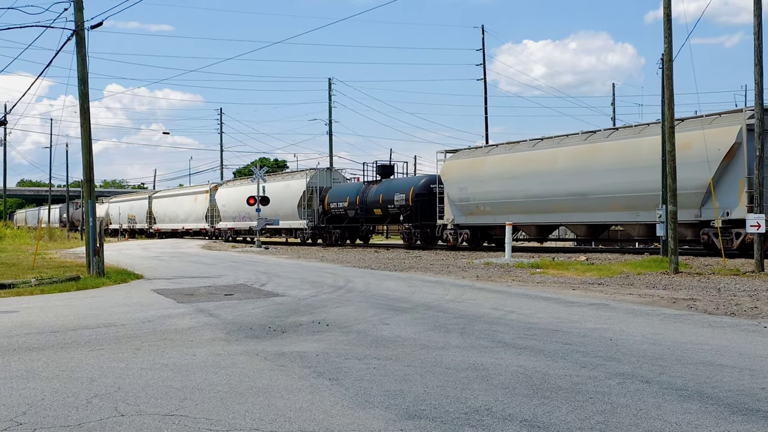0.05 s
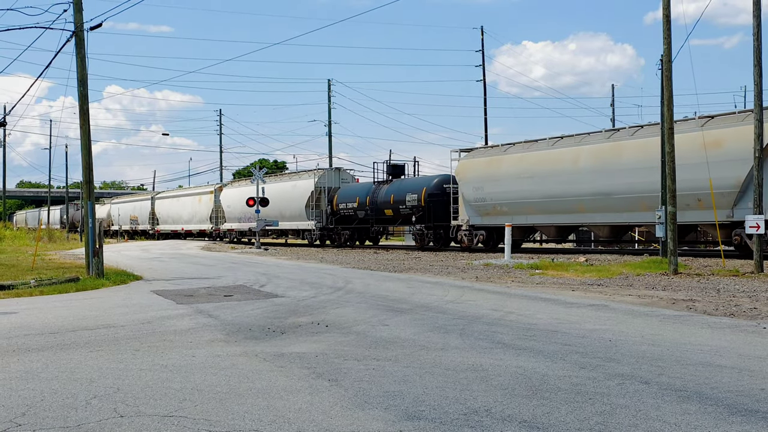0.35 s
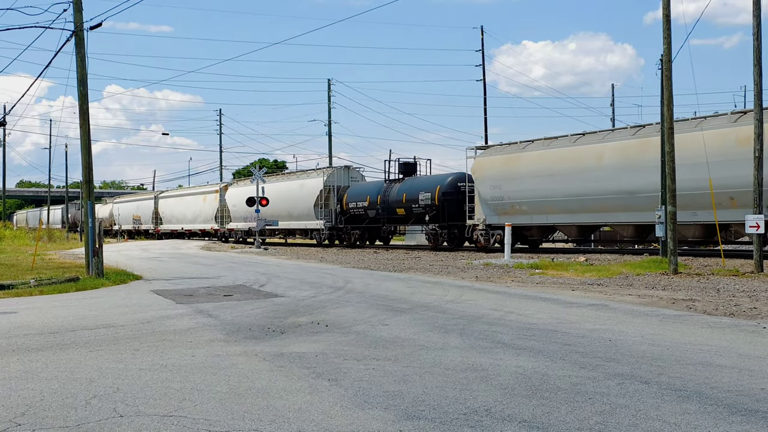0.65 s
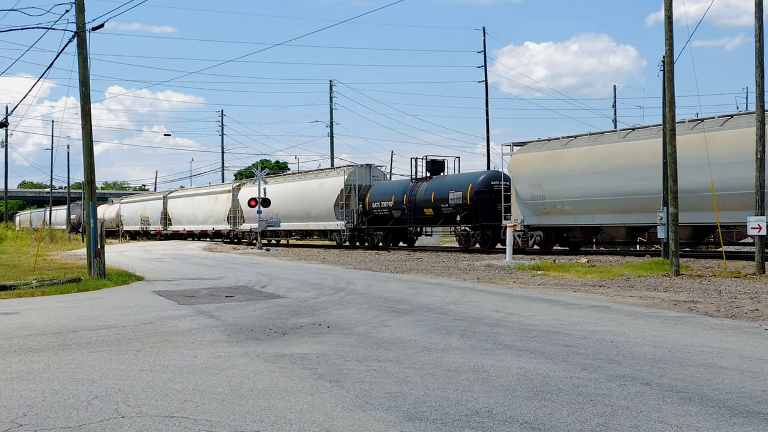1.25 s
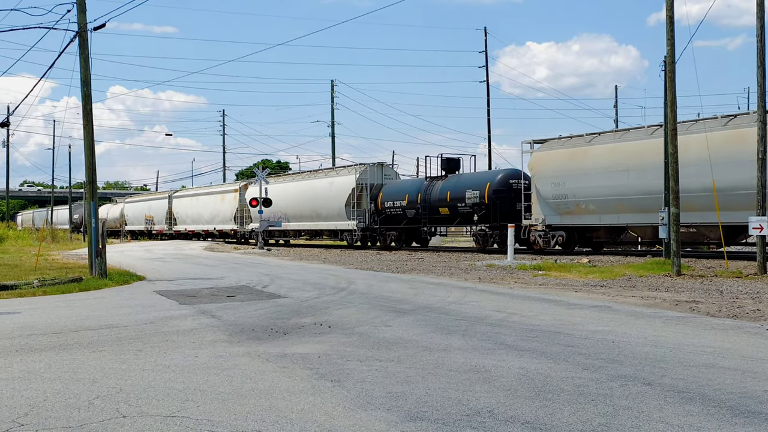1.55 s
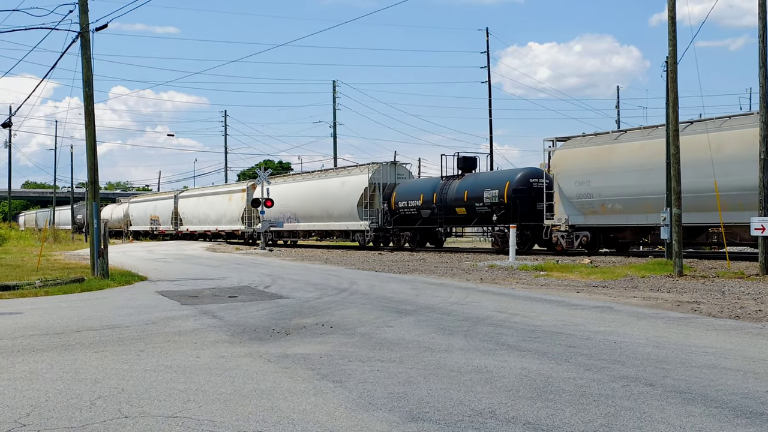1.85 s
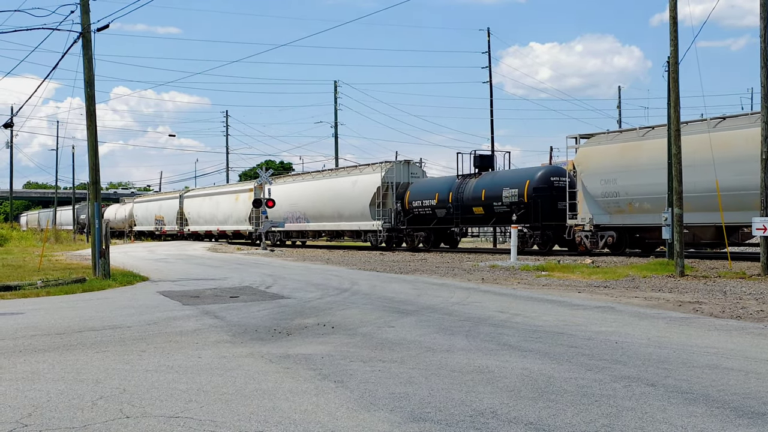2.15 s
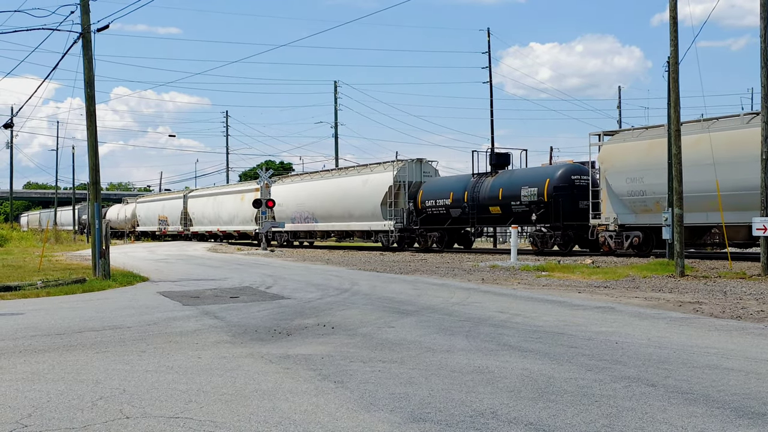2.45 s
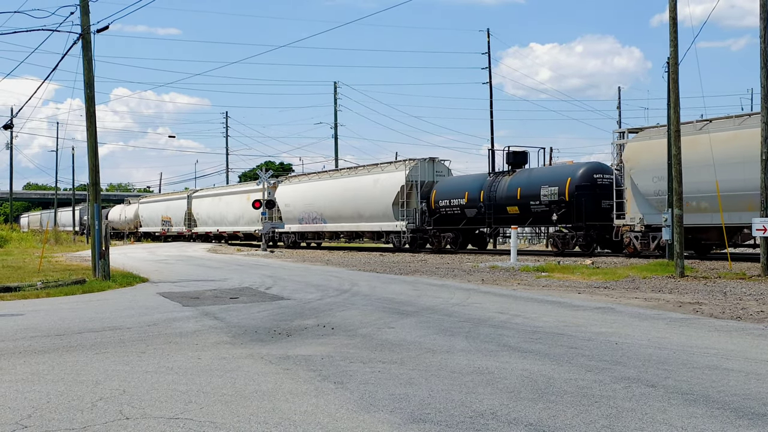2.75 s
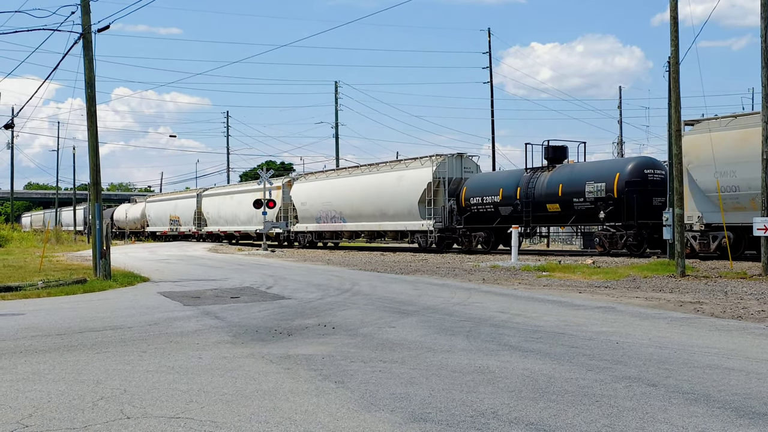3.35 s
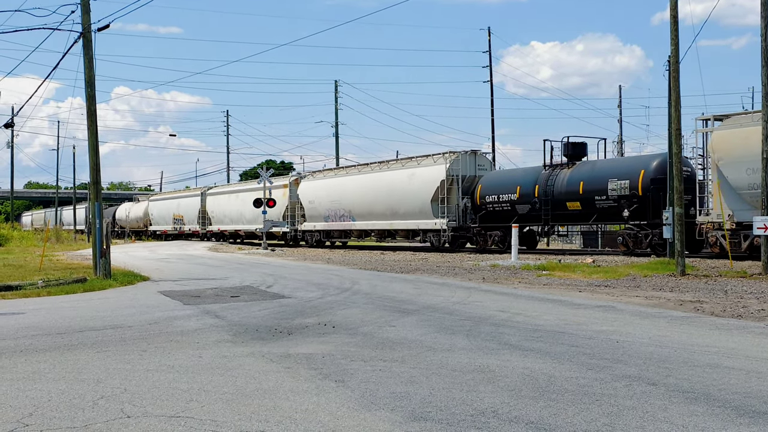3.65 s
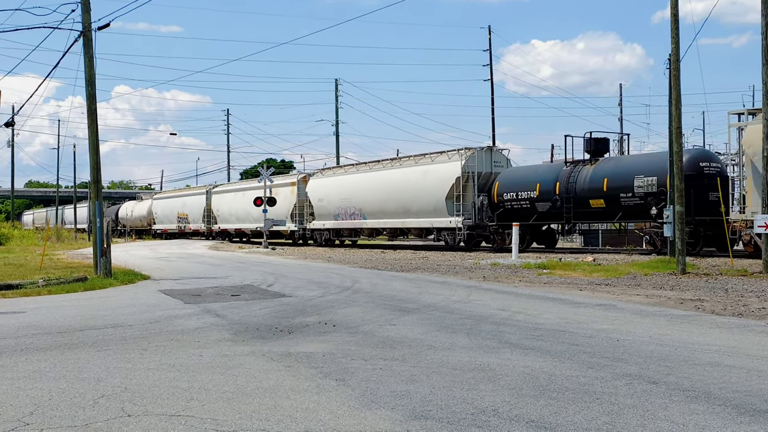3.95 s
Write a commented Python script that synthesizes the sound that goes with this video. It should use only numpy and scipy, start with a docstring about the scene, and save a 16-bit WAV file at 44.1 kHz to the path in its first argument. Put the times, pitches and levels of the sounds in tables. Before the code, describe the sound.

A freight train rolls past with rumbling cars, metallic clanks and high-pitched wheel squeal.

```python
"""At a road crossing, a long freight train rolls through a curve a few car lengths away.
The cars rumble, steel roars on steel, and bogies clank and rattle as wheels strike the rail joints.
Flanges grind on the rail, and stick-slip friction drives the ring modes of the wheels: one long
squeal hops between two groups of modes; later other wheels give a few lower, shorter squeals."""
import sys
import numpy as np
from scipy import signal
from scipy.fft import rfft, irfft
from scipy.io import wavfile

SR = 44100
rng = np.random.default_rng(int(sys.argv[2]) if len(sys.argv) > 2 else 0)


def wav_record(signal):
    """Record a signal, one row per channel, as 16-bit PCM in the file named by sys.argv[1]."""
    frames = np.transpose(np.atleast_2d(signal))
    bounded = np.clip(frames, -1, 1)
    # unit amplitude maps onto the largest positive 16-bit level
    quanta = np.round(bounded * 32767).astype(np.int16)
    wavfile.write(sys.argv[1], SR, quanta)


N = 176400
TIME = np.arange(N) / SR
FREQS = np.maximum(np.arange(N // 2 + 1) * SR / N, 1)
CUTOFF_HZ = 15800
NEAR_LAG_S = .00047   # sound from the near wheels reaches the left port this much later


def from_db(db):
    """Amplitude ratio: a factor of ten per 20 dB."""
    return 10 ** (np.asarray(db) / 20)


def unit_rms(x):
    """Normalisation to unit mean power."""
    return x / np.sqrt(np.mean(np.abs(x) ** 2) + 1e-20)


def in_time(rows):
    """Linear interpolation of each column at every sample."""
    times, *columns = np.transpose(rows)
    return [np.interp(TIME, times, column) for column in columns]


def at_hz(points):
    """Interpolation over log frequency at every bin."""
    hz, value = np.transpose(points)
    return np.interp(np.log(FREQS), np.log(hz), value)


def bandpass(points):
    """Band-pass response: follows a spectrum and falls steeply beyond its ends."""
    below, above = .85 * points[0][0] / FREQS, .85 * FREQS / points[-1][0]
    return from_db(at_hz(points)) / np.sqrt(1 + below ** 12 + above ** 12)


def pan(db):
    """Constant-power panning; db is the level of left over right."""
    ratio = np.atleast_1d(from_db(db))
    return np.array([ratio, np.ones_like(ratio)]) * np.sqrt(2 / (1 + ratio ** 2))


def from_right(x, lag_s):
    """Path difference: a source on the right reaches the left microphone port late."""
    return np.array([np.pad(x[0], (round(lag_s * SR), 0))[:N], x[1]])


def drift(corner_hz):
    """Random modulation: low-passed Gaussian noise of unit RMS."""
    step, settle = 20, 4000
    pole = np.exp(-2 * np.pi * corner_hz * step / SR)
    white = rng.standard_normal(N // step + settle + 2)
    slow = signal.lfilter([1], [1, -2 * pole, pole * pole], white)[settle:]
    return np.interp(np.arange(N) / step, np.arange(len(slow)), unit_rms(slow))


def envelope(start, attack, hold, decay):
    """Linear rise, then exponential damping from `hold` seconds after the start."""
    age = TIME - start
    return np.clip(age / attack, 0, 1) * np.exp(-np.maximum(age - hold, 0) / decay)


def mid_side(mid, side, correlation):
    """Partial coherence: a common part plus a part of opposite sign in the two channels."""
    return np.sqrt(1 + correlation) * mid + np.sqrt(1 - correlation) * side * [[1], [-1]]


# Likeness of the sound field at the two ports: f/Hz, correlation (0-1)
CORRELATION = [(30, .55), (60, 0.79), (130, 0.85), (250, 0.85), (500, 0.86), (1000, 0.91), (2000, .66),
               (4000, 0.42), (8000, 0.07), (15000, 0)]


def noise(gain):
    """Spatial coherence: coloured stereo noise, alike in the bass and diffuse in the treble."""
    mid, side = rfft(rng.standard_normal((2, N)))
    return unit_rms(irfft(gain * mid_side(mid, side, at_hz(CORRELATION)), N))


def rough_noise(gain, depth_db, rate_hz):
    """Amplitude modulation: the octave bands of a noise flicker, partly together."""
    together = drift(rate_hz)
    out = 0
    for octave in range(4, 15):
        band = gain * np.sqrt(np.maximum(1 - np.abs(np.log2(FREQS) - octave), 0))
        if band.max() > gain.max() / 100:
            carrier = np.linalg.norm(band) * noise(band)
            out = out + carrier * from_db(depth_db * (together + drift(rate_hz)) / np.sqrt(2))
    return unit_rms(out)


def dense_modes(depth_db):
    """High modal density: the many narrow resonances of large steel parts, as a gain per bin."""
    return from_db(depth_db * drift(74)[:len(FREQS)])


# Rumble spectrum: f/Hz, level/dB. Its course: t/s, level/dB. All tabulated levels are relative.
RUMBLE_SPECTRUM = [(12, -42), (20, -6.5), (54, 2), (77, 0), (119, -6.5), (192, -4.5), (268, -9), (352, -15),
                   (676, -21), (818, -39), (900, -31.5), (1170, -62), (1980, -120)]
RUMBLE_LEVEL = [(0.0, -12.5), (0.47, -10), (0.57, -16.5), (0.66, -12.5), (2.84, -12.5), (4.0, -11.5)]


def car_rumble():
    """Low-frequency radiation: the moving cars give a lumpy rumble."""
    gain = from_db(in_time(RUMBLE_LEVEL)[0] + 1) * pan(.14)
    rumble = rough_noise(bandpass(RUMBLE_SPECTRUM), depth_db=1.25, rate_hz=33)
    return from_right(gain * rumble, lag_s=.00026)


# Spectrum of steel rolling on steel: f/Hz, level/dB. Its course: t/s, level/dB
ROLLING_SPECTRUM = [(410, -30), (700, -0.5), (874, -19.5), (1180, -8.5), (1720, -11), (1910, -10.5),
                    (2200, -12), (3130, -14.5), (5140, -19), (6090, -17), (15800, -51)]
ROLLING_LEVEL = [(0, -27), (.5, -26.5), (.75, -32.5), (1.8, -31), (2.05, -25), (2.3, -28), (2.42, -25.5),
                 (2.75, -28.5), (3.2, -28.5), (3.36, -25), (4, -26.5)]


def rolling_roar():
    """Rolling noise: wheel-rail contact excites the resonances of the steel, straight ahead."""
    roar = rough_noise(bandpass(ROLLING_SPECTRUM) * dense_modes(3), depth_db=1.56, rate_hz=19)
    return from_db(in_time(ROLLING_LEVEL)[0] + 1.5) * pan(2) * roar


# Spectra of the car's thud, the steel's clang and the bright splash: f/Hz, level/dB
THUD_SPECTRUM = [(70, -25), (150, -4.5), (250, 0), (450, -5), (700, -8.5), (900, -21.5), (1500, -23.5)]
CLANG_SPECTRUM = [(470, -43), (800, -16), (1180, -10.5), (2300, -0.5), (3230, -9.5), (4340, -1.5),
                  (5770, -16.5), (6220, -9.5), (7280, -4.5), (8810, -14.5), (10000, -21), (13000, -51),
                  (22000, -120)]
SPLASH_SPECTRUM = [(6000, -11), (8000, -13), (10000, -1.5), (12000, 2.5), (16000, -0.5)]
# Resonances of a bogie: f/Hz, bandwidth/Hz, level/dB
BOGIE_MODES = [(1995, 5.7, -21), (2257, 48, 0), (3060, 23, 8), (3530, 48, -8.5), (4040, 18, -24),
               (4510, 140, -9.5), (5463, 300, 1), (6280, 190, -7)]
# Impacts at joints: t/s, peak/dB (not played), thud/dB, clang/dB, splash/dB, rattle length/s
IMPACTS = [(0.078, -17, -13, -40, -19, 0.022), (0.1735, -6, -11, -14.5, -35, 0.018),
           (0.2437, -3, -9.5, -10.5, -21.5, 0.039), (0.4946, -5, -12.5, -13.5, -16, 0.029),
           (0.6428, 2, -11, -16, -21, 0.042), (0.899, -10, -20, -20, -45, 0.036),
           (1.026, -14, -31, -25, -39, 0.03), (1.21, -2.5, -13.5, -13.5, -20.5, 0.011),
           (1.445, -12, -14.5, -21.5, -33, 0.037), (1.6055, -9, -11.5, -17, -30, 0.038),
           (1.8545, -9, -23, -18.5, -33, 0.014), (1.965, -13, -10, -26, -40, 0.034),
           (2.364, -16, -10.5, -27.5, -43, 0.042), (2.93, -19, -12, -31.5, -45, 0.03),
           (3.3064, -15, -12, -32, -45, 0.041), (3.885, -16, -16, -29, -47, 0.038)]


def joint_clanks():
    """Impact excitation: a wheel drops at a joint, the car thuds, loose steel rattles and rings."""
    attack_s = .002
    thud = clang = splash = 0
    for start, _, thud_db, clang_db, splash_db, rattle_s in IMPACTS:
        knock = from_db(2) * envelope(start, attack_s, attack_s, decay=.011)
        crack = from_db(-3) * envelope(start, attack_s, attack_s, decay=.0095)
        boom = envelope(start, attack_s, rattle_s / 2, decay=.052)
        rattle = envelope(start, attack_s, rattle_s, decay=.066)
        thud = thud + from_db(thud_db - 1.5) * np.hypot(knock, boom)   # hypot adds powers
        clang = np.hypot(clang, from_db(clang_db + 1) * np.hypot(crack, rattle))
        splash = splash + from_db(splash_db - 3) * envelope(start, attack_s, rattle_s, decay=.047)
    bogie = sum(from_db(db) / (1 + ((FREQS - hz) / (width / 2)) ** 2) for hz, width, db in BOGIE_MODES)
    steel = rough_noise(bandpass(CLANG_SPECTRUM) * dense_modes(5), depth_db=1.5, rate_hz=46)
    steel = steel + from_db(-6) * noise(bogie)
    hiss = rough_noise(bandpass(SPLASH_SPECTRUM), depth_db=1.2, rate_hz=130)
    low = from_right(thud * noise(bandpass(THUD_SPECTRUM)), lag_s=.00038)
    return low + from_right(clang * steel + splash * hiss, NEAR_LAG_S)


# Spectrum of flanges rubbing the rail: f/Hz, level/dB. Its course: t/s, level/dB
GRIND_SPECTRUM = [(1200, -17.5), (2200, -5.5), (2600, -8), (2950, -16.5), (3450, 7), (4000, 1), (4600, 3.5),
                  (5600, -2), (6400, 1.5), (7500, 5), (9000, -14.5), (12000, -16.5), (16000, -17)]
GRIND_LEVEL = [(0, -28), (.4, -20.5), (.8, -24.5), (1.3, -22), (1.95, -21.5), (2.25, -30), (3.15, -37),
               (3.35, -24), (3.7, -32.5), (3.92, -22.5), (4, -47)]


def flange_grind():
    """Sliding friction: flanges rub the rail with a rough, broadband hiss."""
    hiss = rough_noise(bandpass(GRIND_SPECTRUM) * dense_modes(3), depth_db=3.2, rate_hz=32)
    return from_db(in_time(GRIND_LEVEL)[0]) * pan(-7) * hiss


# Spectrum of the highest wheel modes: f/Hz, level/dB. Its course: t/s, level/dB, pan/dB
SIZZLE_SPECTRUM = [(8500, -13), (10500, -16), (11500, 0), (13000, -2.5), (14700, -6), (16000, 1)]
SIZZLE_LEVEL = [(0, -30, -13), (.4, -33, 0), (.9, -33, -3), (1.2, -21.5, -20), (1.5, -22, -16),
                (2.0, -26, -18), (2.2, -34.5, -16), (2.5, -47, 5), (3.15, -47, 0), (3.35, -42, -14),
                (4, -47, -5)]


def wheel_sizzle():
    """Broadband excitation: the narrow, crowded high modes of the wheels sizzle."""
    level_db, pan_db = in_time(SIZZLE_LEVEL)
    gain = from_db(level_db + .88 * drift(16)) * pan(pan_db)
    return gain * noise(bandpass(SIZZLE_SPECTRUM) * dense_modes(3.2))


def ring_mode(hz, flutter=.55, skirt=.6):
    """Multipath scattering: a friction-driven, wandering sine flutters differently on each side."""
    wandering_hz = hz * (1 + .0008 * drift(8.8))
    phasor = np.exp(2j * np.pi * np.cumsum(wandering_hz) / SR)
    # slow scatter is heard as flutter; fast scatter widens the spectral line into a skirt
    mid, side = [flutter * (drift(14) + 1j * drift(14)) + skirt * (drift(70) + 1j * drift(70))
                 for _ in range(2)]
    scatter = mid_side(mid, side, correlation=.36) / 2
    return unit_rms((phasor * (1 + scatter)).real)


# Brief squeals: t/s, length/s, decay time/s, f/Hz, level/dB, pan/dB, overtone loss/(dB per octave)
SHORT_SQUEALS = [(0.51, 0.095, 0.031, 7290, -5.5, 26, 38), (0.637, 0.087, 0.076, 7288, -10, 14, 38),
                 (.495, .06, .06, 2259, -20, -4, 30), (.66, .05, .08, 2261, -25, -4, 30),
                 (.90, .04, .04, 2280, -26, -3, 30), (0.51, 0.28, 0.12, 13040, -36, 3, 30),
                 (1.145, 0.044, 0.039, 2620, -18.5, -2, 25), (1.095, 0.076, .04, 3523, -22, -7, 25),
                 (1.288, .12, 0.036, 3523, -20.5, -16, 25), (1.38, 0.1, 0.032, 1960, -33, 0, 25),
                 (1.6, 0.034, 0.043, 3523, -19, -15, 25), (3.168, 0.073, 0.071, 1745, -21, -4.5, 7.5),
                 (3.45, 0.13, .05, 2176, -30, -4, 26), (3.60, 0.034, 0.032, 1562, -15, -3.5, 13),
                 (3.71, 0.1, 0.063, 1555, -20.5, -2.5, 8), (3.648, 0.031, 0.024, 2058, -23, -5, 24),
                 (3.645, 0.061, 0.085, 1030, -18.5, -3, 27)]


def short_squeals():
    """Mode locking: a wheel sings briefly in a single mode, with weak harmonics."""
    out = 0
    for start, length, decay, hz, db, pan_db, loss_db in SHORT_SQUEALS:
        tone = sum(from_db(-loss_db * np.log2(k)) * ring_mode(k * hz, flutter=.35, skirt=.27)
                   for k in range(1, 4) if k * hz < CUTOFF_HZ)
        out = out + from_db(db) * pan(pan_db) * envelope(start, .025, length, decay) * tone
    return out


# Ring modes of a wheel: f/Hz, level/dB, pan/dB, group (0 lower drive, 1 upper drive)
WHEEL_MODES = [(972, -20, 0, 1), (1775, -21, 2, 0), (2621, -20, 0, 0), (3522, -14, -12, 0),
               (4474, -13.5, -9, 0), (5434, 2.5, -14, 0), (6416, .5, -14, 1), (7388, -7, -7, 1),
               (8345, -18, -7, 1), (9318, -12.5, -3, 1), (10244, -24, -8, 1), (11224, -22, -13, 0),
               (12118, -21, -14, 0), (12850, -20, -14, 1), (14777, -15, -18, 1), (15472, -24, -18, 1),
               (15741, -21, -18, 1)]


def flange_touch():
    """Transient excitation: a brief flange contact draws a bright zing from a slightly detuned wheel."""
    detune, tilt_db_per_octave = .992, 2
    ring = 0
    for hz, db, pan_db, _ in WHEEL_MODES:
        level_db = db / 2 + tilt_db_per_octave * np.log2(hz / WHEEL_MODES[0][0])
        ring = ring + from_db(level_db) * pan(pan_db / 2 + 10) * ring_mode(hz * detune)
    return from_db(-22) * unit_rms(ring) * envelope(start=.087, attack=.0093, hold=.07, decay=.036)


# Friction drive of the two groups of WHEEL_MODES: t/s, lower level/dB, upper level/dB
SQUEAL_DRIVE = [(0, -28.5, -42), (.45, -40, -43), (.85, -30, -39), (1.10, -22, -43), (1.125, -12.5, -30),
                (1.20, -13, -17.5), (1.27, -20, -15.5), (1.36, -18.5, -16.5), (1.41, -20.5, -13),
                (1.52, -19.5, -16.5), (1.66, -27, -21), (1.78, -21, -17), (1.83, -16.5, -22),
                (1.88, -20.5, -20), (2.04, -16, -20), (2.075, -36, -27), (2.2, -47, -46), (2.7, -70, -66)]
# Pitch of the sixth mode, which the others follow in proportion: t/s, f/Hz
SQUEAL_PITCH = [(0, 5405), (.7, 5385), (1.15, 5426), (1.5, 5431), (2.05, 5442)]


def wheel_squeal():
    """Self-excited vibration: stick-slip keeps a wheel's modes singing, each stuttering on its own."""
    pitch_ratio = in_time(SQUEAL_PITCH)[0] / WHEEL_MODES[5][0]
    lower_db, upper_db = in_time(SQUEAL_DRIVE)
    out = 0
    for hz, db, pan_db, group in WHEEL_MODES:
        drive_db = upper_db if group else lower_db
        stutter_db = 1.2 * drift(22)
        out = out + from_db(db + drive_db + stutter_db) * pan(pan_db) * ring_mode(hz * pitch_ratio)
    return out


def scene():
    """Superposition of the whole train; the squealing wheels are the near ones on the right."""
    background = car_rumble() + rolling_roar() + joint_clanks()
    near_wheels = flange_grind() + wheel_sizzle() + wheel_squeal() + flange_touch() + short_squeals()
    return background + from_right(near_wheels, NEAR_LAG_S)


# Colour of the two microphone ports: f/Hz, left over right level/dB
PORT_BALANCE = [(300, -1), (1300, 0), (3500, 0), (6500, -0.5), (7300, 8.5), (8200, 20), (9500, 5),
                (11000, 5), (16000, -6)]


def record(dry):
    """Microphone response: port colour, saturation of the highest peaks and a steep low-pass."""
    coloured = irfft(rfft(dry) * pan(at_hz(PORT_BALANCE)), N)
    saturated = coloured / (1 + coloured ** 8) ** (1 / 8)
    return irfft(rfft(saturated) / np.sqrt(1 + (FREQS / CUTOFF_HZ) ** 400), N)


dry = scene()
out = record(dry)
wav_record(out)
```